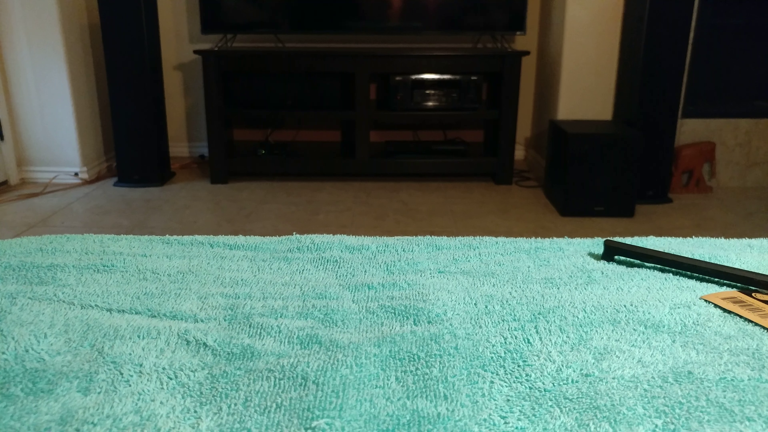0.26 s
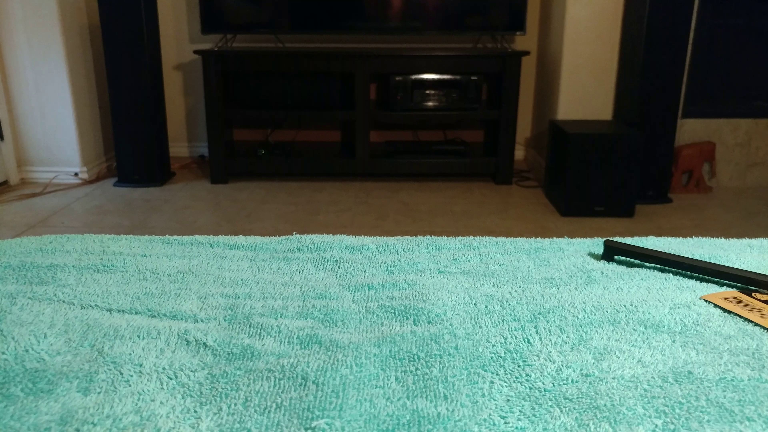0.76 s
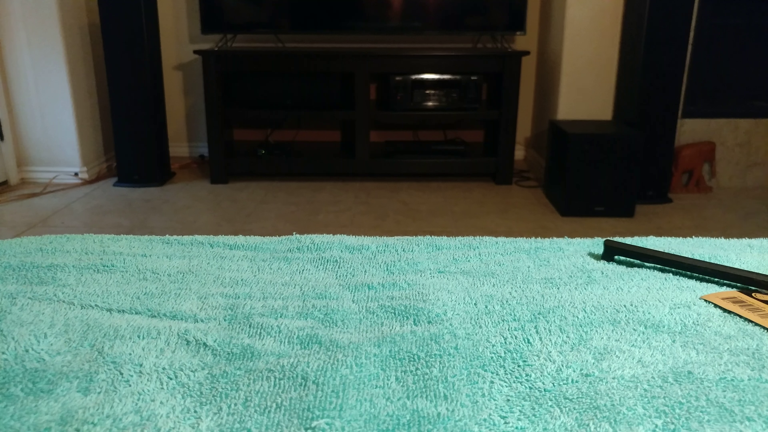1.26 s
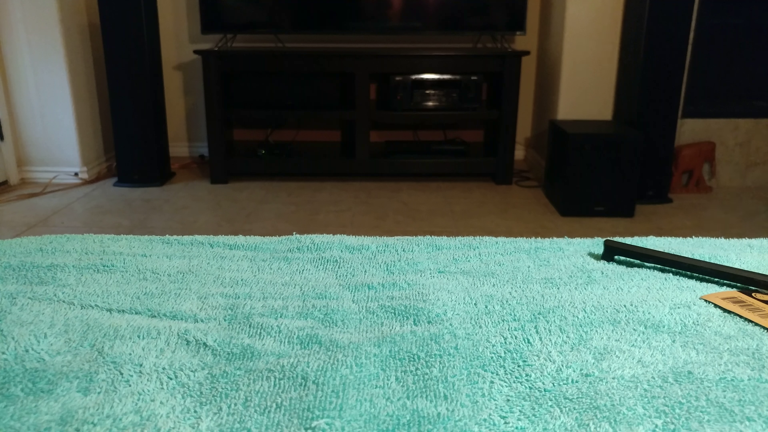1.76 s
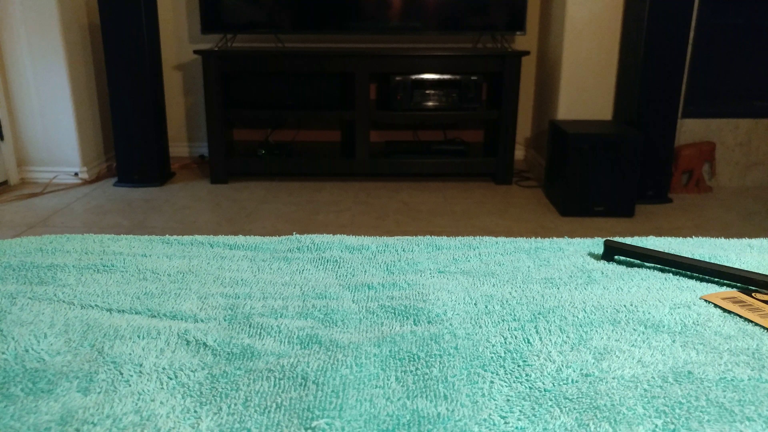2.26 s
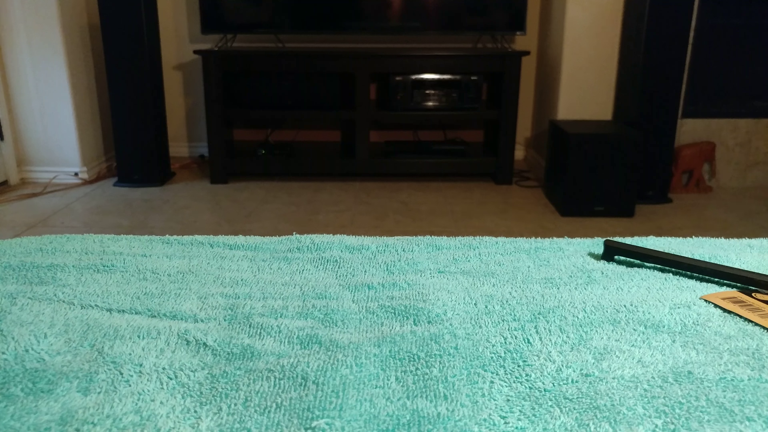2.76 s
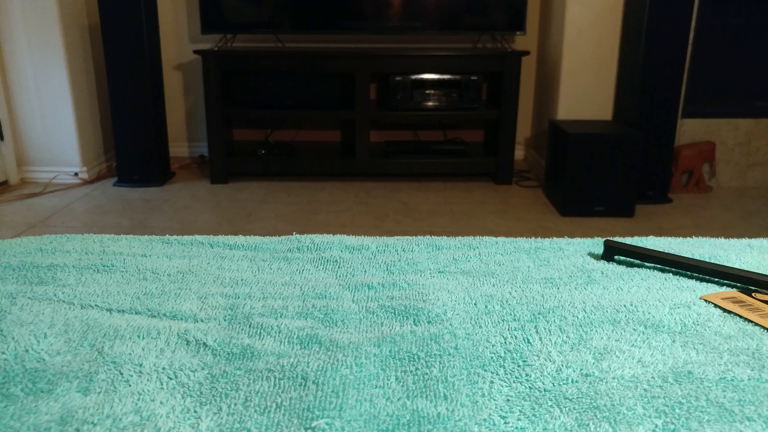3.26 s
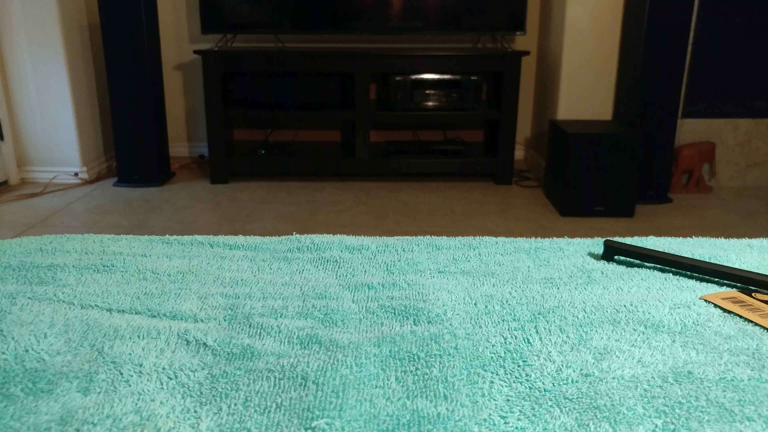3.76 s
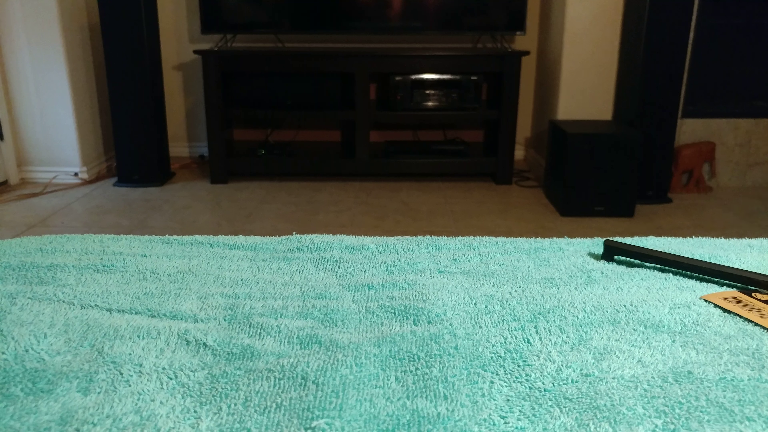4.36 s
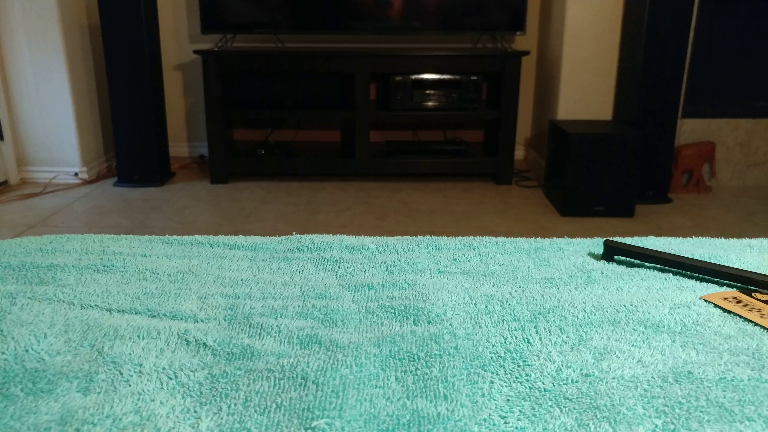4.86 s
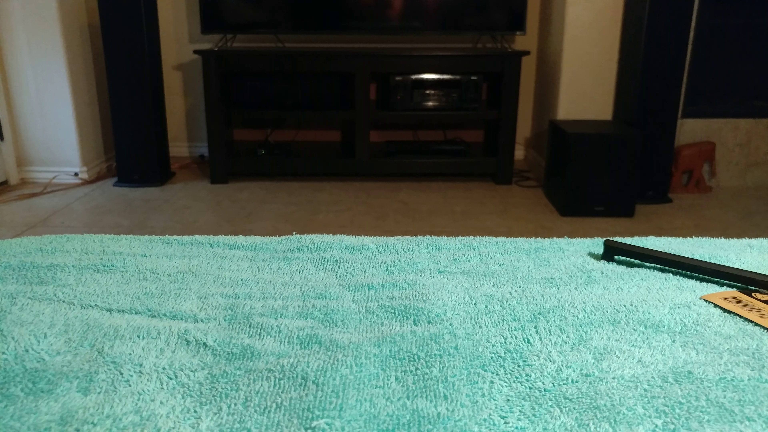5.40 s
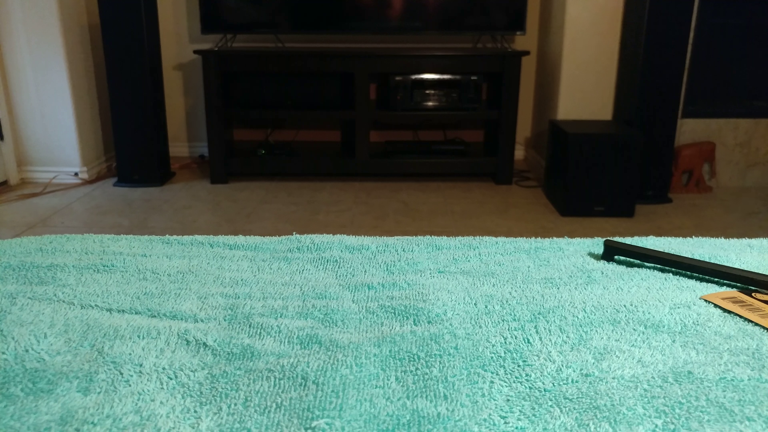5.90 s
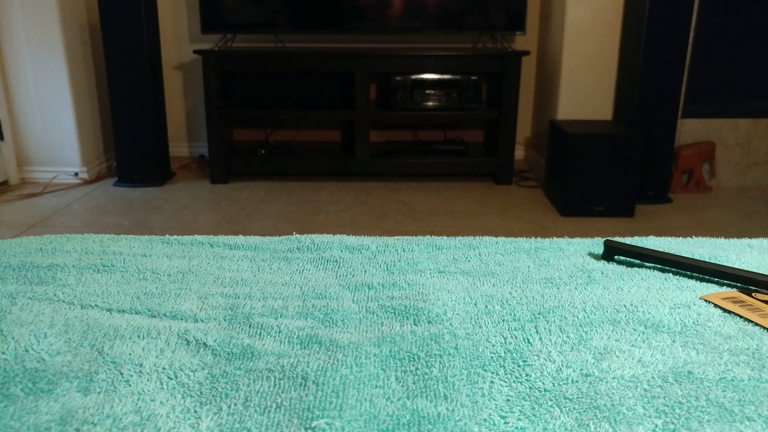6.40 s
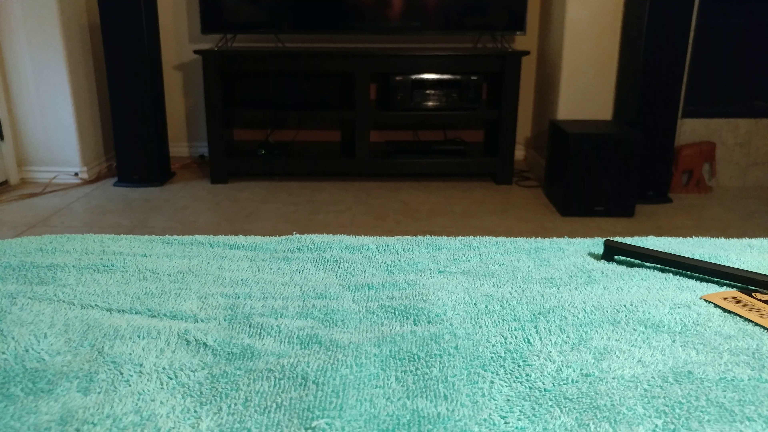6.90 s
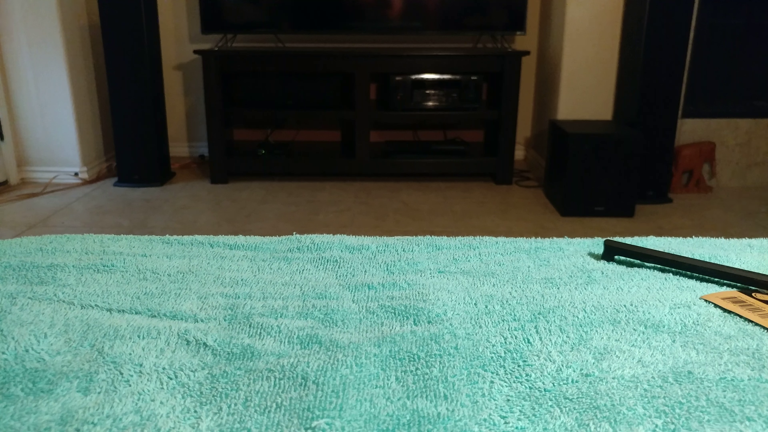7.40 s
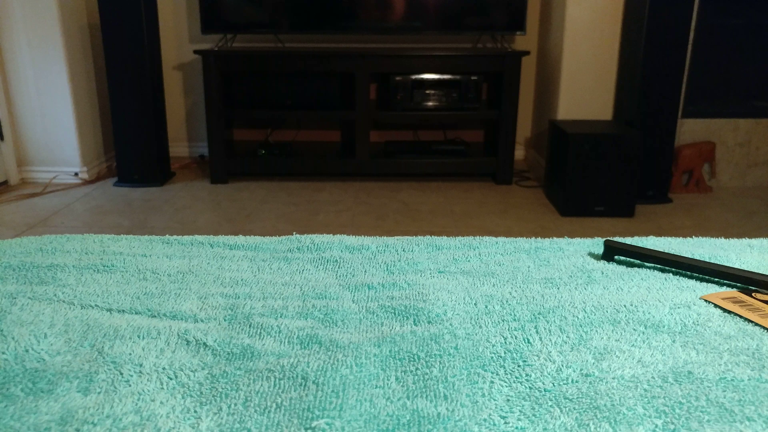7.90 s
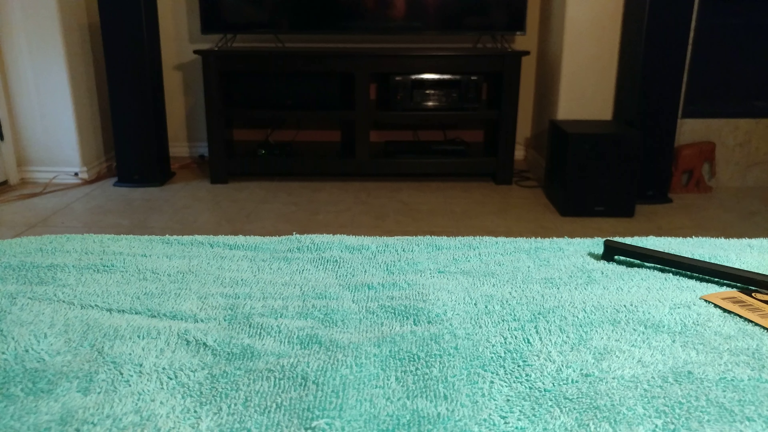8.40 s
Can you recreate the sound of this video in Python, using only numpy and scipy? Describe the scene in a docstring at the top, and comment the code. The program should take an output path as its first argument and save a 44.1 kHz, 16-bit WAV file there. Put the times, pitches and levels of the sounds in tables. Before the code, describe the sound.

Close stereo pickup in a hard-floored living room, steel parts slightly left, over very faint hiss and a low, wavering motor hum. From 0 to 1.2 s there are faint rubbing and tiny ticks. A tight cluster of medium clacks falls at 1.45-1.65 s, with soft low knocks beneath. Light contacts follow at 2.1 and 2.6 s with a brief scrape, then strong clacks at 2.8 and 3.0 s, ringing only milliseconds. Near quiet until a single crisp click at 4.66 s. Small ticks at 5.4 and 5.75 s, a lead-in at 6.07 s, then the loudest event at 6.14-6.18 s: a hard, bright, rattling snap of several impacts with a short room tail. Another click at 6.48 s, a weak one after. From 7.1 s, soft rubbing; moderate clicks and dull thumps at 7.67-7.9 s, then small clicks until a last muted clack at 8.45 s.

```python
"""Sharp steel clicks, singles and clusters: rifle parts are handled and fitted near the microphones in a
living room with a hard floor. Each contact chatters for a few milliseconds and rings the short modes of the
parts; soft knocks are pairs of fading tones, and rubbing drives the same modes with random grains.
Early echoes and a diffuse noise tail make the room; motor tones hum far off under noise for the room air."""
import sys
import numpy as np
from scipy import signal
from scipy.fft import rfft, irfft, next_fast_len
from scipy.io import wavfile

SR = 44100
rng = np.random.default_rng(int(sys.argv[2]) if len(sys.argv) > 2 else 0)


def inscribe(sig):
    """Save sig as 16-bit PCM at rate SR to the path in sys.argv[1].

    A 1-D sig is mono; a 2-D sig holds one channel per row.
    Samples are clipped to [-1, 1] before scaling.
    """
    pcm = np.round(np.clip(np.atleast_2d(sig).T, -1, 1) * 32767)
    wavfile.write(sys.argv[1], SR, pcm.astype(np.int16))


N = 381465

# Modes of the steel parts, damped by the hands.
# Each row: frequency in Hz, relative level in dB, nominal 60 dB decay time in seconds.
PART_MODES = [(610, -3.5, 0.011), (901, 2.34, 0.013), (1100, -1.5, 0.023), (1438, 1.86, 0.039),
              (1778, 6.5, 0.0093), (2064, 3, 0.022), (2374, 3, 0.015), (2797, 7.5, 0.0078),
              (3235, 6, 0.0067), (3555, 1.5, 0.018), (3885, -3, 0.013), (4542, 5.14, 0.0027),
              (5097, -0.6, 0.0077), (5700, 1.1, 0.007), (6704, 1.45, 0.014), (6884, -4, 0.0022),
              (7956, -4.5, .006), (8424, 3, .007), (8921, 5, .008), (9220, -3, 0.013), (10090, -25.5, .008),
              (11280, -6, .005), (11100, -2.85, .004), (12225, -5.8, .004), (13580, 5.5, .004),
              (15110, 3.3, .004), (17930, -5, .004)]
LONGEST_RING_CYCLES = 45  # no mode's nominal decay time exceeds this
LEFT_LEAD_S = 0.00024  # clicks and rubbing reach the left microphone first


def amp(db):
    """Decibels to gain."""
    return 10 ** (np.asarray(db) / 20)


def rms_one(x):
    """Scale to unit rms."""
    return x / np.sqrt(np.mean(x ** 2) + 1e-20)


def energy_one(x):
    """Scale each row to unit energy."""
    return x / np.sqrt(np.sum(x ** 2, axis=-1, keepdims=True))


def at_hz(points, hz):
    """Read a spectrum table on a log-frequency axis."""
    table_hz, values = np.transpose(points)
    return np.interp(np.log(hz), np.log(table_hz + 1), values)


def add(out, s, sound):
    """Mix a sound in at time s, in seconds."""
    i = max(round(s * SR), 0)
    out[:, i:i + sound.shape[1]] += sound[:, :N - i]


def band(x, low, high):
    """Butterworth band-pass."""
    return signal.sosfilt(signal.butter(2, [low, high], "band", fs=SR, output="sos"), x)


def stereo(mid, side, alike):
    """Blend two independent signals into a left-right pair of the given likeness."""
    return np.sqrt(1 + alike) * mid + np.sqrt(1 - alike) * side * [[1], [-1]]


def air():
    """Room air and microphone hiss: steady noise, most alike in the bass and nearly unrelated in the treble."""
    # Spectrum of the noise. Each row: frequency in Hz, relative level in dB per Hz.
    air_spectrum = [(15, -51.5), (25, -23.5), (43, -8), (65, -9), (82, -10), (120, -9), (146, -11.5),
                    (225, -4.5), (264, -13), (329, -7.5), (630, -21.5), (720, -22.5), (1800, -34),
                    (5000, -39), (9000, -37.5), (11000, -45), (17000, -39)]
    # Left-right likeness. Each row: frequency in Hz, likeness from 0 to 1.
    air_likeness = [(40, 0.4), (180, 0.84), (500, 0.54), (1500, 0.12), (5000, 0.05), (15000, 0.042)]
    level_db = -60
    size = next_fast_len(N)
    hz = np.arange(size // 2 + 1) * SR / size + 1
    mid, side = rfft(rng.standard_normal((2, size))) * amp(at_hz(air_spectrum, hz))
    alike = np.clip(at_hz(air_likeness, hz), 0, 1)
    noise = irfft(stereo(mid, side, alike), size)[:, :N]
    return amp(level_db) * rms_one(noise)


def hum():
    """Appliance motors: tones of fixed pitch; the lowest pair beats, and all swell and sink."""
    # Motor tones. Each row: frequency in Hz, relative level in dB.
    motor_tones = [(57.2, -66), (58.84, -73), (107.8, -73), (120.0, -72), (172.9, -76), (178.2, -78),
                   (216.8, -72), (237.5, -68), (239.9, -75), (286.5, -78), (296.9, -74), (323.5, -75)]
    # Swelling and sinking of the hum. Each row: time in seconds, gain in dB.
    swell_points = [(0, -0.5), (.5, -5.5), (.8, 1), (2.9, 1.5), (3.25, 4.5), (3.5, -4.5), (4.7, -6),
                    (5.6, -2.5), (6.1, 2), (7.1, -2.5), (7.5, 3), (8.2, 4.5), (8.45, 1), (8.65, 1)]
    upper_follows = 0.91  # share of the swell, in dB, that the upper tones follow
    in_step_s = 3.2  # a moment when the two lowest tones beat in step
    gain_db, left_right_db = 0.5, -1.5
    t, out = np.arange(N) / SR, 0
    swell_db = np.interp(t, *np.transpose(swell_points))
    start = rng.uniform(0, 2 * np.pi, len(motor_tones))
    for k, (hz, level_db) in enumerate(motor_tones):
        upper = k > 1
        tone = np.sin(2 * np.pi * hz * (t - in_step_s) + upper * start[k])
        follows = upper_follows if upper else 1
        out = out + np.sqrt(2) * amp(level_db + gain_db + swell_db * follows) * tone
    return out * amp(left_right_db * np.array([[.5], [-.5]]))


def room(sent):
    """Diffuse tail: noise that builds up and dies band by band, partly different at each microphone."""
    # Decay of the tail. Each row: frequency in Hz, 60 dB decay time in seconds.
    tail_t60 = [(300, 0.16), (1300, 0.5), (3500, 0.48), (6500, 0.49), (9000, 0.4), (14000, 0.18)]
    # Strength of the tail. Each row: frequency in Hz, level in dB before the build-up.
    tail_level = [(300, -27.5), (1300, -33), (3500, -39.5), (6500, -37.5), (9000, -36.5), (14000, -35)]
    build_s = 0.0096
    alike_hz = 500  # well below this both microphones hear nearly the same room
    t = np.arange(SR // 2 + SR // 4) / SR
    white = rng.standard_normal((2, 2, len(t)))
    edges = 150 * 2 ** np.arange(0, 7.1, .5)  # half-octave bands, Hz
    answer = 0
    for k, (low, high) in enumerate(zip(edges, edges[1:])):
        hz = np.sqrt(low * high)
        decay_db = at_hz(tail_level, hz) - 60 * t / at_hz(tail_t60, hz)
        # neighbouring bands use different noise
        mid, side = band(white[k % 2], low, high) * amp(decay_db)
        alike = max(1 / (1 + (hz / alike_hz) ** 2), .25)
        answer = answer + stereo(mid, side, alike)
    answer = answer * (1 - np.exp(-(t / build_s) ** 2))
    return signal.fftconvolve(sent[None], answer, axes=1)[:, :N]


def echoes(direct):
    """The nearest surfaces send each sound back as short smeared copies."""
    # Nearest surfaces. Each row: delay in seconds, level in dB, left-right difference in dB.
    surfaces = [(.0048, -15, .3), (.0115, -12, -.3), (.017, -18, .3), (.027, -17, -.3)]
    answer = np.zeros((2, SR // 20))
    smear = rng.standard_normal((len(surfaces), 2, 40)) * np.exp(-np.arange(40) / 8)
    for (delay, echo_db, pan_db), burst in zip(surfaces, smear):
        side_db = echo_db + pan_db * np.array([[.5], [-.5]])
        add(answer, delay, energy_one(burst) * amp(side_db))
    return signal.fftconvolve(direct[None], answer, axes=1)[:, :N]


def rubbing():
    """Dense grains of friction drive the parts' modes, damped by the hands."""
    # Parts rubbing, one row a stroke. Each row: time of most pressure in seconds, level of the lower
    # modes in dB, build-up in seconds, let-go in seconds, upper modes in dB relative to the lower.
    strokes = [(0.005, -50, 0.024, 0.05, -26), (0.255, -53.5, 0.17, 0.011, -6),
               (0.56, -53.5, 0.041, 0.058, 0), (0.812, -71.5, 0.12, 0.084, -5),
               (0.948, -62, 0.077, 0.036, -4), (1.004, -65.5, 0.011, 0.14, -3), (1.52, -68, .04, 0.27, -24),
               (2.06, -53, 0.2, .015, -5.5), (2.16, -63.5, 0.034, 0.08, -7),
               (2.631, -43.5, 0.045, 0.031, -36), (2.757, -45.5, 0.028, 0.18, -18.5),
               (3.652, -65, 0.047, 0.053, 6), (3.876, -81, 0.0093, .12, 12),
               (5.274, -72.5, 0.17, 0.093, 6.5), (5.349, -69, 0.044, .06, 4),
               (5.711, -78, .01, 0.16, -13.5), (5.756, -74.5, .02, .12, -6.5),
               (7.078, -64.5, 0.074, 0.038, 3), (7.151, -59.5, .015, 0.028, -11), (7.36, -55, 0.1, .1, -1),
               (7.6, -67, 0.15, 0.021, -2), (7.84, -63, 0.035, .1, -0.5), (7.884, -68, .02, .1, -8),
               (7.942, -61.5, .06, .15, 11.5), (8.3, -63.5, 0.025, 0.12, -13.5), (8.43, -68, .08, .02, -13)]
    grains_per_s = 3100
    range_db = 30  # a stroke gains this much in its build-up and loses it in its let-go
    split_hz = 5000  # between lower and upper modes
    bass_hz, bass_db = 2500, -4.5  # rubbing stirs the modes below this more weakly
    top_hz, top_db = 10300, -18  # and hardly reaches modes above this
    grains = (rng.random((2, N)) < grains_per_s / SR) * rng.standard_normal((2, N))
    low, high = 0, 0
    for k, (hz, mode_db, t60) in enumerate(PART_MODES):
        # rubbed modes die faster than struck ones
        ring_s = 0.63 * min(t60, LONGEST_RING_CYCLES / hz)
        r = amp(-60 / (ring_s * SR))
        resonance = [1, -2 * r * np.cos(2 * np.pi * hz / SR), r * r]
        rung = amp(mode_db) * rms_one(signal.lfilter([1, 0, -1], resonance, grains[k % 2]))
        if hz < split_hz:
            low = low + rung * amp(bass_db * (hz < bass_hz))
        else:
            high = high + rung * amp(top_db * (hz > top_hz))
    t, out = np.arange(N) / SR, np.zeros(N)
    low, high = rms_one(low), rms_one(high)
    for s, low_db, build_s, release_s, rel_db in strokes:
        near = slice(max(int((s - 2 * build_s) * SR), 0), int((s + 2 * release_s) * SR))
        away = np.maximum((s - t[near]) / build_s, (t[near] - s) / release_s)
        pressure = amp(low_db - range_db * away)
        out[near] += pressure * (low[near] + high[near] * amp(rel_db))
    later = np.roll(out, round(LEFT_LEAD_S * SR))
    return np.array([out * amp(-1.8), later * amp(-5.0)])


def knocks():
    """Soft contact: a low mode and its overtone swell in and die fast."""
    # Dull knocks of hands and stock on the rug. Each row: start in seconds, level in dB, pitch in Hz.
    dull_knocks = [(0.293, -45, 312), (0.449, -43, 303), (1.477, -33, 333), (1.646, -35.5, 257),
                   (2.078, -41, 598), (2.605, -45.5, 315), (2.842, -28, 456), (3.012, -39, 283),
                   (5.393, -54, 300.2), (5.714, -37, 225.8), (6.135, -36, 522), (7.741, -38, 251),
                   (7.773, -30.5, 203), (7.811, -32, 574), (7.827, -34, 308), (7.87, -58, 367),
                   (8.02, -51, 537), (8.115, -58.5, 206), (8.453, -43, 536)]
    t60_s, swell_in_s = 0.035, 0.0025
    out, t = np.zeros((2, N)), np.arange(4000) / SR
    envelope = amp(-60 * t / t60_s) * (1 - np.exp(-t / swell_in_s))
    for s, level_db, hz in dull_knocks:
        body = np.sin(2 * np.pi * hz * t) + 0.7 * np.sin(2 * np.pi * 1.6 * hz * t)
        add(out, s, amp(level_db - 3.5) * np.tile(body * envelope, (2, 1)))
    return out


def contacts():
    """A burst of micro-impacts drives every mode, each family with the share that this blow gives it.
    Returns the direct sound at both microphones and the radiation averaged over all directions."""
    # Steel contacts. Each row: start in seconds, level in dB, shares in dB of the seven mode families
    # from low to high, energy radiated into the room in dB relative to the level.
    blows = [(0.298, -51, 2, -4, -20, -29, -33, -23, -35, -9),
             (0.409, -37.5, -37, -33, -24, -16, -27, -10.5, -29, 2.5),
             (0.427, -40, -20, -31, -17, -23, -7, -18, -22, -2.5),
             (0.511, -39.5, -39, -21.5, -10, -9, -10, -16, -34, 5.5),
             (1.003, -48.5, -15.5, -13, -13, -23, -6, -17.5, -26, -3),
             (1.21, -40, -33.5, -25, -23, -25.5, -1, -8.5, -36.5, -3.5),
             (1.393, -32.5, -35.5, -14, -20, -12.5, -17, -23, -35, 1),
             (1.453, -15.5, -29.5, -13.5, -6, -12, -9, -15.5, -40, 2),
             (1.477, -15, -18.5, -10.5, -27, -6.5, -24.5, -20.5, -48.5, -7),
             (1.484, -23.5, -35, -5.5, -14.5, -7, -28, -10.5, -41, 6),
             (1.645, -30.5, -38, -5.5, -13, -8.5, -20, -16, -29.5, 2.5),
             (1.649, -19, -27, -36.5, -19.5, -19.5, -24.5, -12.5, -26, -5.5),
             (1.821, -43, -14, -11, -4, -16, -33, -20, -38, -0.5),
             (2.079, -29, -15.5, -11, -16, -21.5, -27.5, -33, -53, -5.5),
             (2.158, -41.5, -9, -7, -12.5, -16, -11, -34, -41, -22),
             (2.605, -32, -15, -12, -11, -13.5, -17.5, -22.5, -38, 3.5),
             (2.633, -31.5, -21, -11.5, -17, -17.5, -19.5, -17, -43, 2),
             (2.803, -6, -35, -18, -15, -10.5, -20, -26, -38.5, -4),
             (2.845, -15.5, -16, -12.5, -30, -11.5, -16, -13, -30.5, -1.5),
             (2.849, -16.5, -20, -13.5, -9, -13.5, -21.5, -24.5, -27, -2.5),
             (3.016, -7.5, -27, -17.5, -13, -7.5, -15, -15, -34.5, -2),
             (3.399, -54.5, -17.5, -17, -14, -10, -25, -33.5, -31.5, 2.5),
             (3.451, -54, -25.5, -7, -11.5, -16, -20, -28, -28, 0),
             (3.651, -46, -33, -20, -10.5, -10.5, -24.5, -25, -35, -2),
             (3.876, -58, -27, -34, -25, -18, -23, -14, -13, 7.5),
             (4.663, -14, -39, -33, -22, -12, -7, -16.5, -35, -1.5),
             (5.395, -36.5, -14.5, -9, -7, -9, -35, -31, -42, -3.5),
             (5.756, -52.5, -8.5, -24, -9.5, -12.5, -18.5, -20, -23, -2.5),
             (6.072, -21.5, -25, -20, -10, -15, -17.5, -18.5, -20.5, -1),
             (6.081, -15.5, -29, -20.5, -13, -15, -15.5, -14.5, -25, -2.5),
             (6.136, -0.5, -41.5, -27.5, -16.5, -14, -9, -12, -16, 5),
             (6.144, -2.5, -48.5, -49, -39, -34.5, -19, -2.5, -22.5, 6),
             (6.155, -6.5, -37.5, -36, -39, -23, -16, -6.5, 6.5, -6),
             (6.164, -10.5, -40, -35, -20, -16.5, -28, -6.5, -11.5, 3.5),
             (6.175, -6.5, -56, -34.5, -26, -9.5, -9, -2.5, -8, 13),
             (6.482, -15.5, -34, -43, -15, -14.5, -14, -2, -21, -2),
             (6.575, -33, -42.5, -41, -35.5, -10, -12.5, -5.5, -23, -5.5),
             (7.16, -42, -34, -21, -11, -18, -5, -15.5, -28, -4),
             (7.341, -45.5, -20.5, -18, -20.5, -18, -17, -20, -32, -1),
             (7.4, -43.5, -12.5, -27, -31, -23, -28, -11.5, -17, -12),
             (7.668, -17, -33.5, -20, -15.5, -17.5, -13.5, -12.5, -25, 0.5),
             (7.737, -38, -11, -7, -18, -18, -19, -13, -22, 5),
             (7.766, -21, -26, -30, -24, -19, -16, -8.5, -26, -2),
             (7.884, -46.5, -20, -23, -6, -17, -21, -15, -29, 3),
             (7.931, -50.5, -25, -23, -17, -6, -10, -8, -20, 20),
             (8.022, -26, -15.5, -31, -20, -14, -19, -19, -39, -4),
             (8.113, -50, -5, -13, -21, -22, -25, -34, -38, -4),
             (8.174, -46, -10, -15, -10, -28, -25, -36.5, -41, -11),
             (8.284, -40.5, -20, -4, -12.5, -17, -21, -26, -38, -2),
             (8.388, -52, -15.5, -18.5, -21, -11, -12, -15, -29, 16),
             (8.406, -36.5, -9, -7, -17, -22, -10, -20, -37.5, -6),
             (8.453, -23, -7.5, -6, -9.5, -12, -12.5, -30, -57.5, -2.5)]
    # Centres of the mode families in Hz; modes between two take a blend.
    family_hz = [800, 1600, 2700, 3700, 5800, 8800, 13000]
    # Blows that catch one mode squarely, so that it sings out of the clatter.
    # Each row: start in seconds, frequency of the mode in Hz, extra level in dB.
    square_blows = [(1.21, 5060, 6.5), (1.478, 1703, 3), (2.604, 2819, 6.5), (2.634, 2819, 7.5),
                    (2.804, 3278, 7), (2.845, 2819, 7), (3.016, 3560, 8), (3.016, 1462, 5.5),
                    (4.663, 6490, 5.5), (7.669, 2819, 6.5)]
    chatter_s = 0.003
    spread_db = 1.5  # each blow lands elsewhere and weights the modes anew
    crest_db, radiated_db = 5.5, 17.5  # click peak, and energy sent to the room, above the level
    radiated_damping = 1.1  # averaged over all directions the modes merge into broader peaks
    left_right_db = 2.6  # the hands are nearer the left microphone
    hz, mode_db, t60 = np.transpose(PART_MODES)
    t = np.arange(1500) / SR
    fade = np.log(1000) * 1.5 * t / np.minimum(t60, LONGEST_RING_CYCLES / hz)[:, None]
    # each mode swells in before it dies
    rings = energy_one(np.sin(2 * np.pi * hz[:, None] * t) * fade * np.exp(-fade))
    broad = energy_one(rings * np.exp(-(radiated_damping - 1) * fade))
    power = np.abs(rfft(broad, 2048)) ** 2
    age = t[:1000] / chatter_s
    chatter_shape = np.minimum(age * 3, 1) * np.exp(-age ** 4)  # quick start, abrupt end
    chance = rng.standard_normal((len(blows), 1000 + len(hz)))
    direct, radiated = np.zeros((2, N)), np.zeros((1, N))
    for (s, level_db, *shares_db, room_db), draw in zip(blows, chance):
        impacts, spread = np.split(draw, [1000])
        share_db = np.interp(np.log(hz), np.log(family_hz), shares_db)
        for at_s, square_hz, extra_db in square_blows:
            share_db[np.argmin(np.abs(hz - square_hz))] += extra_db * (abs(at_s - s) < .004)
        strength = amp(share_db + mode_db + spread_db * spread)
        chatter = impacts * chatter_shape
        driven = signal.fftconvolve(rings, chatter[None], axes=1)
        click = strength @ energy_one(driven)
        click = click / np.abs(click).max() * amp(level_db + crest_db)
        steps = np.arange(len(click))
        later = np.interp(steps - LEFT_LEAD_S * SR, steps, click, left=0)
        pair = np.array([click * amp(left_right_db / 2), later * amp(-left_right_db / 2)])
        add(direct, s, pair)
        # over all directions the modes add by energy and the chatter's notches fill in
        spectrum = np.sqrt(amp(share_db + mode_db) ** 2 @ power)
        even = np.roll(irfft(spectrum), 300)[:600] * np.hanning(600)
        even = energy_one(even) * amp(level_db + room_db + radiated_db)
        add(radiated, s - 220 / SR, even[None])
    return direct, radiated[0]


def scene():
    """Handling sounds, their room, and the background."""
    clicks, radiated = contacts()
    soft = knocks() + rubbing()
    early = echoes(clicks[0] + soft[0])
    tail = room(radiated + soft[0])
    return clicks + soft + early + tail + air() + hum()


def record(dry):
    """The loudest peaks are rounded, the deep bass rolls off, the top is cut."""
    rounded = dry / (1 + np.abs(dry / .92) ** 4) ** .25
    rounded = signal.sosfilt(signal.butter(2, 40, "high", fs=SR, output="sos"), rounded)
    # 80 dB down from 16500 Hz up
    return signal.sosfilt(signal.cheby2(24, 80, 16500, fs=SR, output="sos"), rounded)


dry = scene()
out = record(dry)
inscribe(out)
```